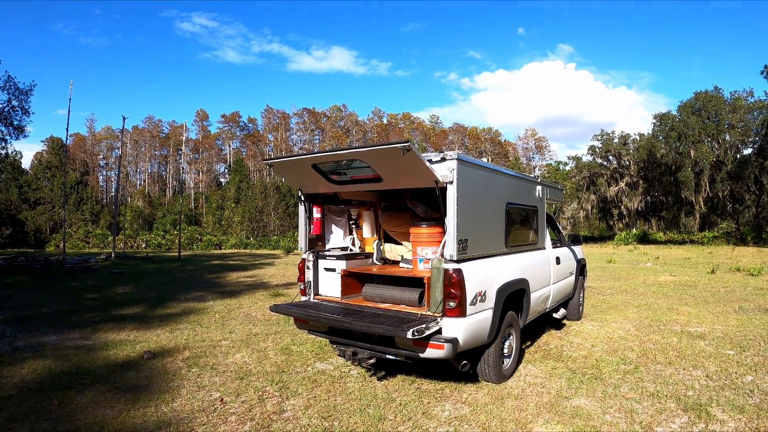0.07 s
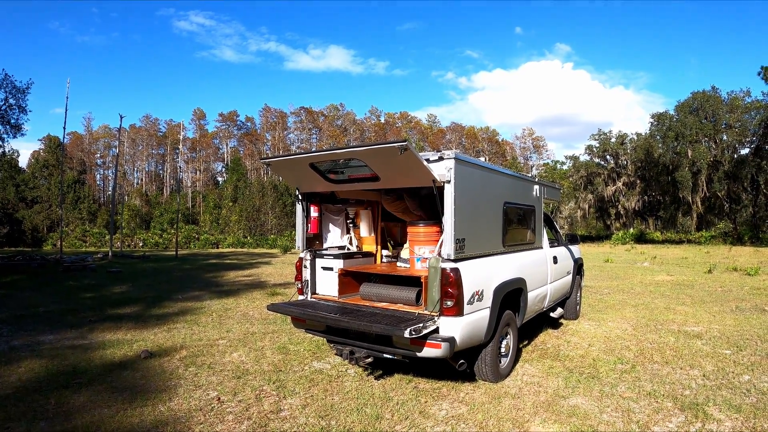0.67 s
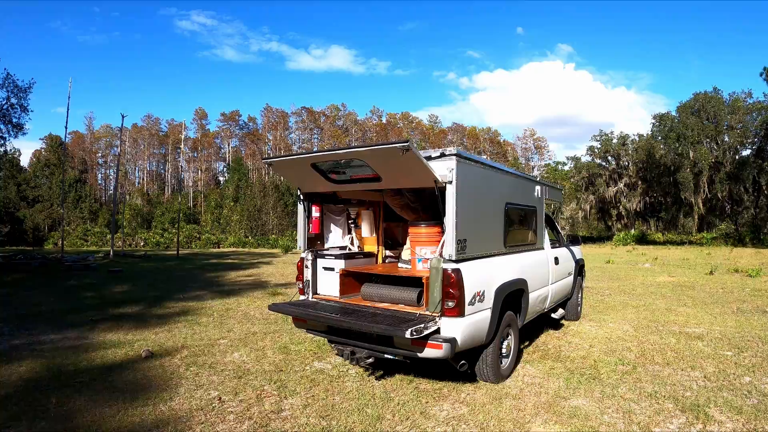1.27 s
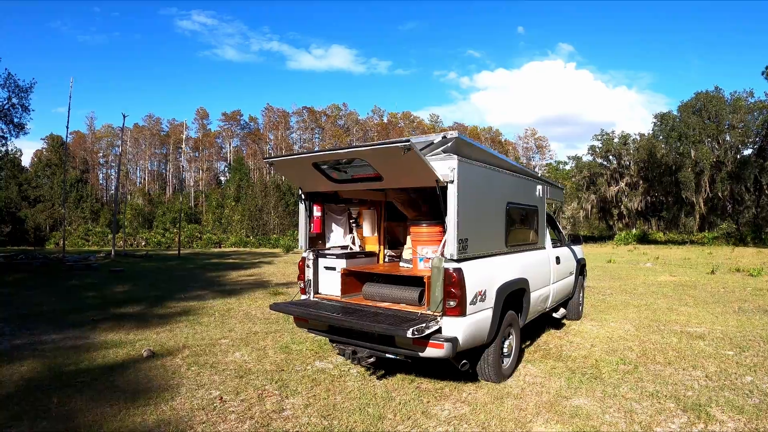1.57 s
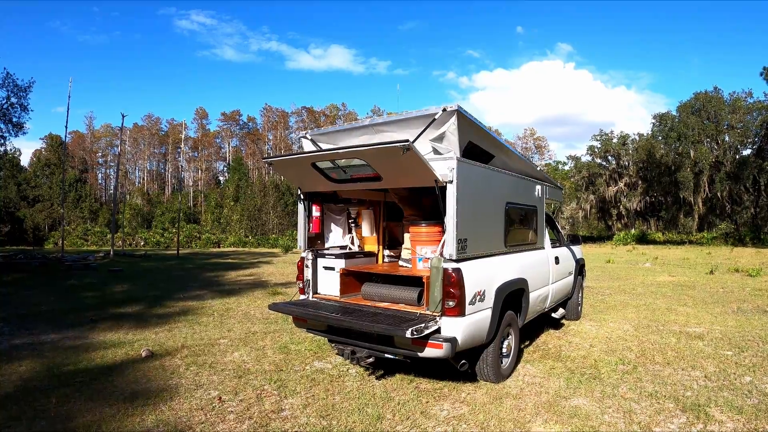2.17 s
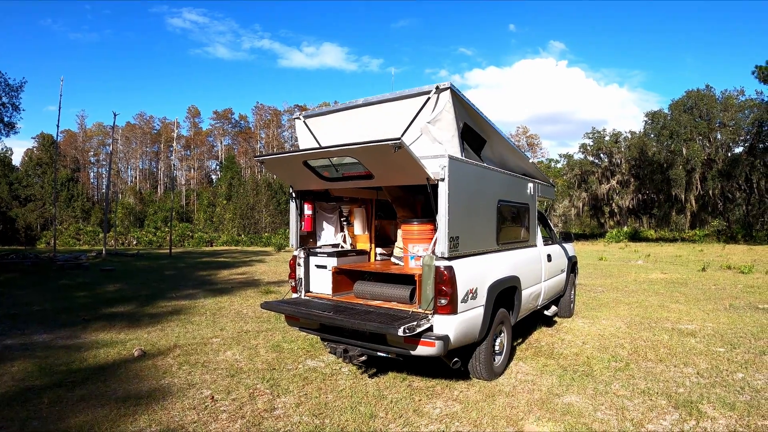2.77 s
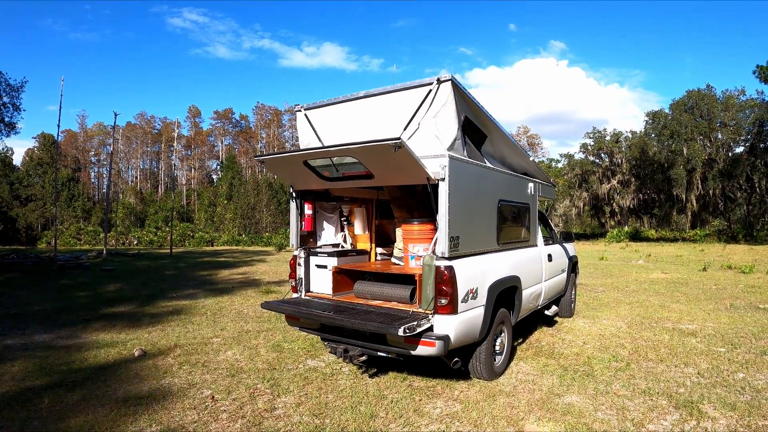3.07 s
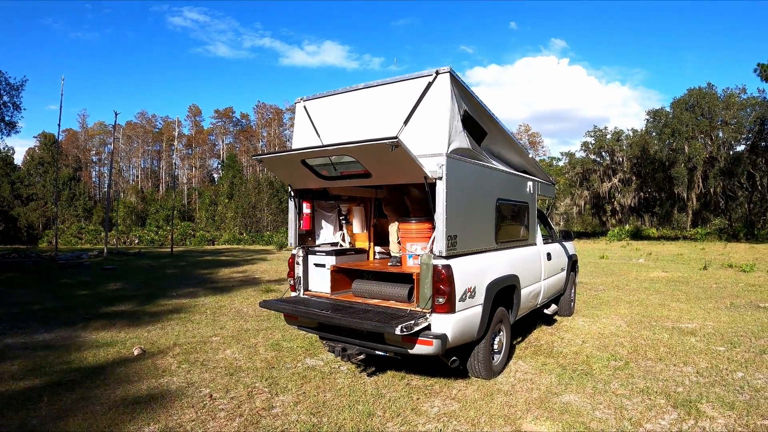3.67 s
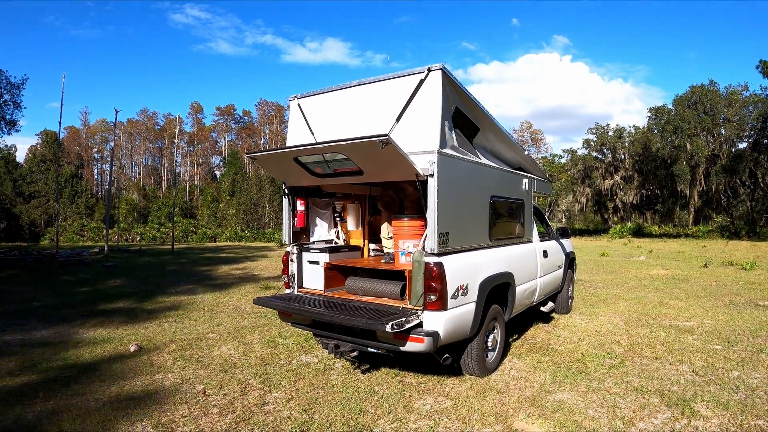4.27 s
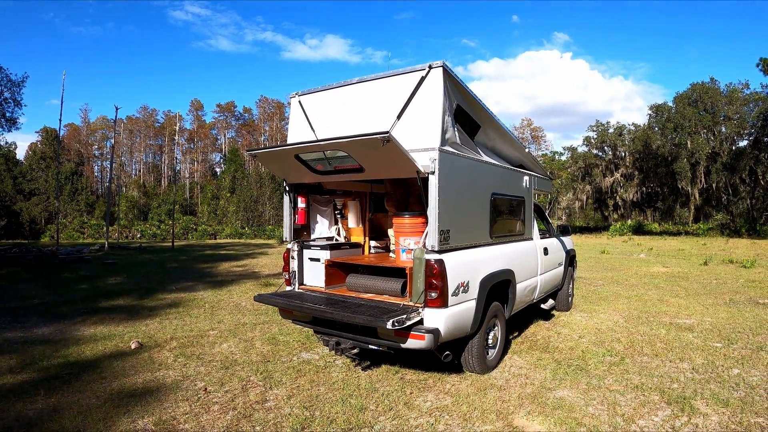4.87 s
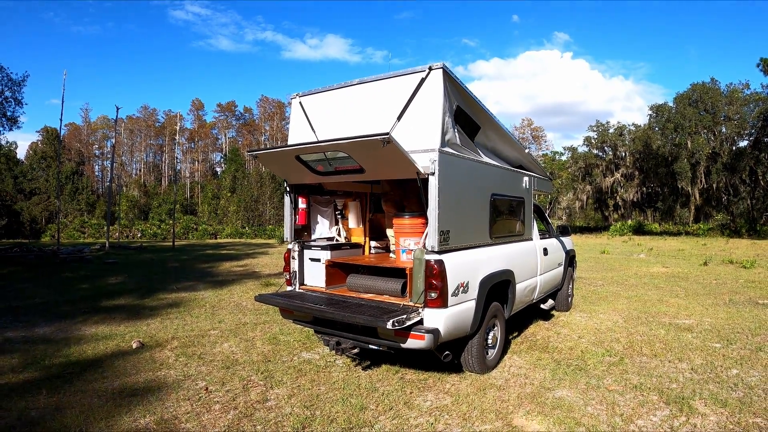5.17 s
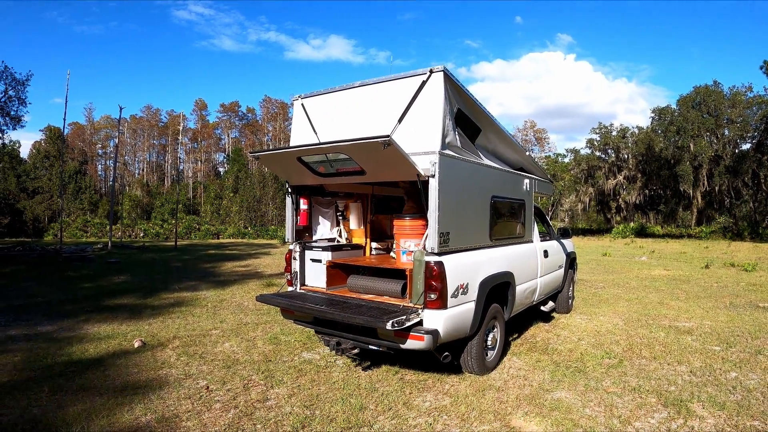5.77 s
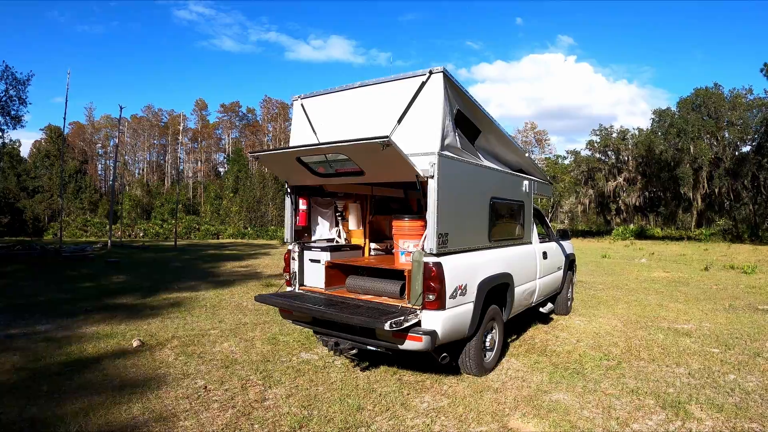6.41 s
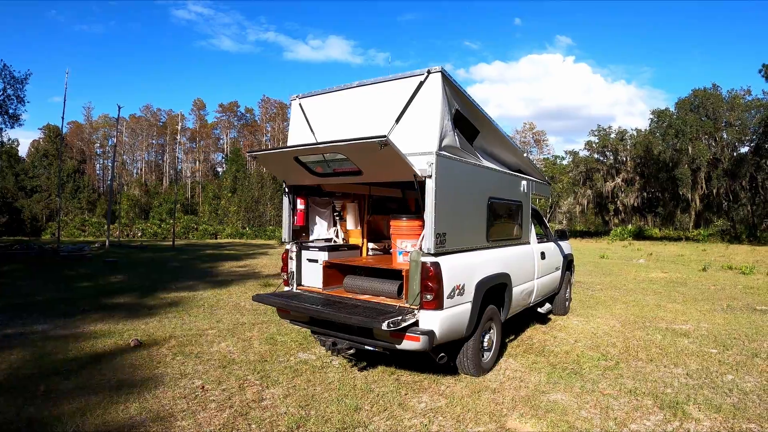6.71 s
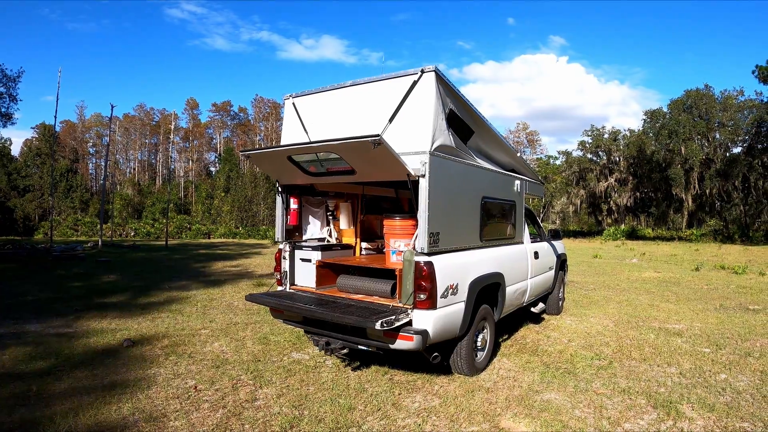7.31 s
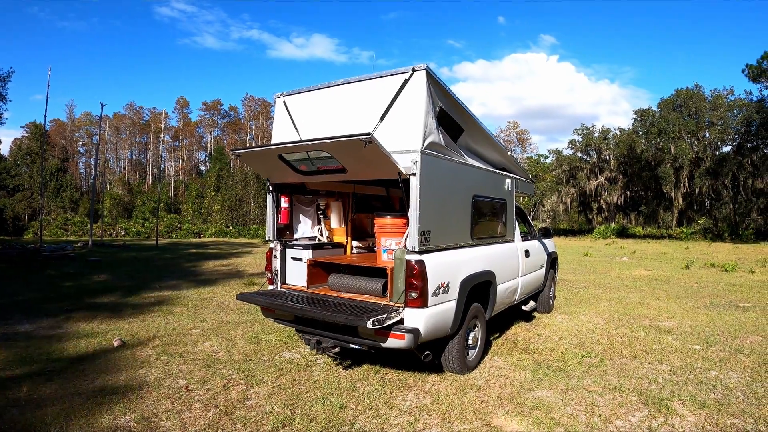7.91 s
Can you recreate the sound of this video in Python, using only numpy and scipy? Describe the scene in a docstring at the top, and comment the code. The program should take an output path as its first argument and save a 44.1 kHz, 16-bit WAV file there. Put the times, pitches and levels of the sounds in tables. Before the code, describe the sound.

Someone shifts inside a wooden truck camper, thumping and knocking, then pushes up the canvas-sided roof, which bangs against its stop.

```python
"""Inside a small wooden truck camper, a close pair of microphones an arm's length from the walls.
Someone shifts about and pushes up the spring-assisted roof. Feet thump the floor, panels knock and
scuff, fittings tick and creak, and the canvas wall rustles as it unfolds. The roof bangs against its
stop and leaves the shell swaying. Behind it all lies the faint hush of the field outside."""
import sys
import numpy as np
from scipy import signal
from scipy.fft import rfft, irfft, next_fast_len
from scipy.io import wavfile

SR = 44100
rng = np.random.default_rng(int(sys.argv[2]) if len(sys.argv) > 2 else 0)


def wav_out(sig):
    """Save sig, one row per channel (or a flat mono array), as 16-bit PCM at SR to the path in sys.argv[1]."""
    wavfile.write(sys.argv[1], SR, np.round(np.clip(np.atleast_2d(sig).T, -1, 1) * 32767).astype(np.int16))


N = 355005

# the roof's travel, t/s: the push begins, the springs take over, the canvas is taut, the stop is hit
PUSH_S, SPRINGS_S, TAUT_S, STOP_S = 1.77, 2.8, 3.438, 3.705
MOVE_RISE_DB_PER_S, MOVE_FALL_DB_PER_S = 244, 100

# blows on panels and frame: t/s, body/dB, clack/dB, edge/dB, fizz/dB, t60/s, the part's note f/Hz
PANEL_BLOWS = [(0.428, -31, -30.5, -54, -77, 0.092, 532), (0.592, -29.5, -38.5, -68, -71, 0.13, 290),
               (0.645, -37.5, -50, -80, -82, 0.11, 296), (0.852, -37, -39, -43, -57, 0.15, 510),
               (1.263, -35, -40.5, -58, -60, 0.15, 369), (1.299, -34, -42.5, -61, -68, 0.07, 347),
               (1.428, -41.5, -45.5, -57, -58, 0.18, 403), (1.483, -35.5, -44.5, -46, -69, 0.048, 706),
               (1.965, -35.5, -35.5, -52.5, -77, 0.062, 650), (2.372, -41.5, -56, -67, -70, 0.12, 266),
               (2.6192, -38.5, -33.5, -47, -59, 0.012, 840), (2.809, -42.5, -38.5, -54, -74, 0.11, 663),
               (3.666, -24, -30, -39.5, -34.5, 0.18, 433), (3.699, -30.5, -34, -34.5, -41, 0.04, 820),
               (3.7067, -19, -21.5, -32, -25.5, 0.076, 496), (3.965, -46.5, -45, -52, -58.5, 0.048, 805),
               (4.105, -42, -49.5, -59, -51, 0.043, 364), (4.672, -28.5, -44, -32.5, -45, 0.098, 466),
               (4.7776, -34, -35.5, -36, -54, 0.084, 530), (5.706, -41, -53, -57, -91, 0.12, 620),
               (5.894, -55, -58.5, -65.5, -66, 0.052, 600), (6.247, -48, -54.5, -83, -88, 0.032, 617),
               (6.325, -45, -52, -67, -63, 0.089, 570), (6.933, -34, -55, -59, -46.5, 0.18, 264),
               (7.888, -48, -79, -82, -82, 0.14, 262)]
# weight landing on the floor or pushing the roof: t/s, level/dB, f/Hz, swell/s, relative boom/dB
FOOTFALLS = [(0.319, -41.5, 114, 0.013, -4), (0.396, -36, 25, 0.016, -8.5),
             (0.551, -21.5, 60, 0.019, -10.5), (0.568, -18.5, 40, 0.034, -10.5),
             (0.824, -26.5, 16, 0.045, -22), (1.245, -31, 18.6, 0.068, -13.5),
             (2.958, -40, 140, 0.0088, -1), (3.374, -38, 130, 0.0056, -12), (4.071, -41, 85, 0.029, 0),
             (5.03, -47, 163, 0.016, -7), (5.547, -42.5, 55, 0.013, -5), (5.696, -32, 50, 0.023, -7.5),
             (6.316, -33, 68, 0.035, -7), (6.391, -30, 45, 0.046, -14.5), (6.681, -42, 59, 0.029, -21),
             (6.921, -29, 52, 0.023, 1), (7.905, -37.5, 34.7, 0.025, -25)]
# shoes, knees and roof frame sliding on wood: t/s, length/s, level/dB, relative grit/dB, rasp f/Hz
WOOD_SCUFFS = [(0.546, 0.013, -34.5, -15, 570), (0.558, 0.032, -31.5, -10, 1300),
               (0.825, 0.059, -44, -2.5, 910), (0.851, 0.056, -41, -21, 490),
               (1.019, 0.08, -41, -10.5, 850), (1.069, 0.065, -36.5, -25, 1090),
               (1.214, 0.11, -42, -18, 1120), (1.263, 0.11, -40.5, -19, 440),
               (3.243, 0.056, -42.5, -3, 1040), (3.428, 0.075, -39, -2.5, 950),
               (4.055, 0.042, -52, -0.5, 970), (4.393, 0.062, -54, -5.5, 426),
               (4.833, 0.044, -48.5, -6, 1180), (6.344, 0.13, -46.5, -17, 457), (6.858, 0.1, -51, -17, 474),
               (6.927, 0.035, -36.5, -13.5, 283)]
# snaps of canvas and small fittings: t/s, body/dB, edge/dB, fizz/dB, note f/Hz
SNAPS = [(0.199, -74, -57, -39.5, 7300), (1.112, -42, -40, -52, 3400), (0.8268, -44, -45.5, -57, 3460),
         (1.2357, -71, -44, -79, 3340), (1.324, -38, -63, -45.5, 2400), (1.515, -44, -43, -50.5, 4400),
         (1.6923, -44.5, -43.5, -43, 2400), (1.722, -39, -41.5, -41.5, 2380), (2.3716, -42, -43, -31, 9300),
         (2.4448, -44, -46, -44.5, 5400), (3.062, -44, -56, -49, 2870), (3.2046, -40.5, -43, -36.5, 5370),
         (3.4195, -34, -33, -24.5, 7100), (4.309, -80, -60.5, -50, 8100), (7.031, -68, -58, -44.5, 8900)]
# struts and seams sliding under load: t/s, length/s, level/dB, start f/Hz, end f/Hz, width/Hz
STRUT_CREAKS = [(2.153, 0.51, -57.5, 1005, 940, 70), (2.117, 0.71, -59.5, 690, 650, 60),
                (3.381, 0.022, -37.5, 1070, 1200, 90), (3.425, 0.0092, -36, 680, 980, 110),
                (3.461, 0.034, -37, 723, 1290, 70), (3.484, 0.025, -37, 1550, 2050, 221)]
# joints cracking as the load shifts: t/s, level/dB
JOINT_CRACKS = [(0.183, -36.5), (0.291, -40), (4.9286, -39), (4.951, -41), (5.154, -42.5), (5.351, -44.5),
                (5.5367, -44), (5.588, -42), (6.4536, -41)]
# body and clothes brushing the panels: t/s, length/s, rubbing/dB, cloth/dB
BODY_MOVES = [(0.0, 0.018, -50, -53.5), (0.196, 0.33, -59.5, -61.5), (0.428, 0.21, -49, -61),
              (0.838, 0.26, -47.5, -81), (1.046, 0.32, -47, -68), (1.417, 0.26, -48.5, -57.5),
              (1.91, 0.19, -49, -54.5), (2.28, 0.21, -56, -60.5), (3.037, 0.036, -55.5, -55),
              (4.765, 0.14, -55.5, -59), (5.046, 0.032, -57, -62), (5.63, 0.48, -61.5, -87),
              (6.342, 0.42, -55.5, -67.5), (6.944, 0.77, -60.5, -65), (7.778, 0.15, -61.5, -60)]
# cloth passing over cloth: t/s, length/s, level/dB, relative speed
CLOTH_STROKES = [(3.8, 0.0072, -51, 0.81), (6.707, 0.1, -56, 0.67), (7.281, 0.013, -47, 0.96),
                 (7.455, 0.05, -52.5, 0.98)]
# resonances of the panels and cabin air: f/Hz, level/dB, t60/s
CABIN_MODES = [(146.6, 5, 0.13), (206, -4.5, 0.17), (323.6, -2.5, 0.2), (471.7, -8.5, 0.2),
               (545, -16, 0.17), (635, -11.5, 0.4), (845, -5, 0.091), (1126, -5.5, 0.13), (1350, -2, 0.12),
               (1675, -23, 0.09)]
# spectra of the drumming roof, swaying shell, rubbed wood, canvas, swishes and air: f/Hz, level/dB
ROOF_SPECTRUM = [(45, -10), (80, 8.5), (150, -0.5), (210, -3), (300, -12.5), (500, -17.5), (1200, -48)]
SWAY_SPECTRUM = [(4, -40), (13, 13.5), (24, -11.5), (38, 2.5), (52, -1), (85, -17), (200, -27), (600, -91)]
RUB_SPECTRUM = [(90, -50), (200, -2), (300, 1.5), (500, -2.5), (800, -4), (1200, -5), (1900, -11),
                (2800, -29), (4500, -25.5), (9000, -56)]
CANVAS_SPECTRUM = [(900, -9), (2000, -1.5), (2800, -10.5), (4200, -8.5), (6000, -9.5), (9000, -3),
                   (12000, -7), (16000, -16)]
SWISH_SPECTRUM = [(1200, -14.5), (2700, -5.5), (3400, -9), (4500, -26), (7000, -14), (9000, -0.5),
                  (11000, -8), (16000, -9)]
AIR_SPECTRUM = [(30, 9), (100, -14.5), (250, -16.5), (550, -6), (1000, -12.5), (2200, -15), (4000, -17.5),
                (9000, -15), (16000, -19)]
# likeness of the two microphones: f/Hz, correlation
PAIR_COHERENCE = [(60, .998), (700, .99), (1400, .95), (2200, .75), (3100, .1), (16000, 0)]
# balance of the pair: f/Hz, left minus right level/dB
PAIR_BALANCE = [(60, 1.3), (500, 1.7), (1100, 2.8), (2300, 4.7), (10000, 4), (13000, -2.5)]
# response of each microphone: f/Hz, level/dB
MIC_RESPONSE = [(30, 9), (150, -0.5), (500, -2.5), (1200, -6.5), (2000, -7.5), (3000, -5.5), (4300, -8.5),
                (6000, -7), (8200, -7.5), (11000, -10.5), (15500, -13)]


def knocks():
    """Each blow rings the part that it lands on, the panels and the metal frame; the treble dies first."""
    out = np.zeros((2, N))
    for s, body_db, clack_db, edge_db, fizz_db, t60, hz in PANEL_BLOWS:
        blow = echoes(t60, direct=5.1, tail_db=-21, tail_t60=0.13)
        wood = panels(blow + 1.6 * peak(blow, hz, 7), ring=1.2)
        crack = echoes(t60 * 0.84, direct=5.7, tail_db=-16, tail_t60=0.15)
        metal = crack + 0.99 * (peak(crack, 2670, 2.8) + peak(crack, 3550, 32) + peak(crack, 7500, 2.6))
        add(out, s, struck(band(wood, 147, 834), body_db) + struck(band(wood, 1035, 1880), clack_db))
        add(out, s, struck(band(metal, 1650, 4600), edge_db) + struck(band(metal, 6400, 13300), fizz_db))
    return out


def thumps(ring_db=-12, ring_t60=0.66):
    """A soft heavy push swells one low swing of the floor, which rings on, and shakes the panels."""
    out, t = np.zeros((2, N)), np.arange(SR) / SR
    for s, db, hz, swell_s, boom_db in FOOTFALLS:
        push = (t / swell_s * np.exp(1 - t / swell_s)) ** 2
        ring = gain_of(ring_db - 60 * t / ring_t60) * (1 - np.exp(-t / swell_s)) ** 2
        swing = (push + ring) * np.sin(2 * np.pi * hz * t)
        boom = gain_of(boom_db) * push * unit_rms(band(noise(SR), 45, 138))
        add(out, s, gain_of(db) * (swing + boom))
    return out


def roof_bounce(first_hz=20, settled_hz=15, settle_s=0.162, attack_s=0.029, t60=0.75, linger_t60=4.9):
    """The stop leaves the roof bouncing on its springs, pumping the cabin air; the swings slow a little."""
    t = np.maximum(np.arange(N) / SR - STOP_S, 0)
    hz = settled_hz + (first_hz - settled_hz) * np.exp(-t / settle_s)
    phase = 2 * np.pi * np.cumsum(hz) / SR
    decay = gain_of(-20 - 60 * t / t60) + gain_of(-27.5 - 60 * t / linger_t60)
    return decay * (1 - np.exp(-t / attack_s)) * (np.sin(phase) + 0.1 * np.sin(2 * phase))


def shell(effort, drum_db=-9, lean_db=-4, travel_db=-60):
    """The roof drums and the whole box heaves; both also follow whoever leans on it."""
    drumming = shaking(rest_db=-69, step_db=-32.5, step_fall_db_per_s=46.5, stop_db=-30, lead_s=0.089,
                       rise_db_per_s=81, fall_db_per_s=77, tail_db=-37.5, tail_db_per_s=19.5)
    swaying = shaking(rest_db=-55, step_db=-13.5, step_fall_db_per_s=50, stop_db=-28, lead_s=0.079,
                      rise_db_per_s=103, fall_db_per_s=68, tail_db=-39.5, tail_db_per_s=13)
    travel = gain_of(travel_db) * swell(PUSH_S, STOP_S - PUSH_S)
    flex = unit_rms(coloured(panels(noise(), ring=1), ROOF_SPECTRUM))
    sway = unit_rms(coloured(noise(), SWAY_SPECTRUM))
    return (power_sum(drumming, travel, gain_of(drum_db) * effort) * flex
            + power_sum(swaying, gain_of(lean_db) * effort) * sway)


def shaking(rest_db, step_db, step_fall_db_per_s, stop_db, lead_s,
            rise_db_per_s, fall_db_per_s, tail_db, tail_db_per_s):
    """Gain of the box's shaking: footfalls jolt it, the roof builds it up to the stop, then it settles."""
    steps = [gain_of(db + step_db) * swell(s + swell_s, 0, fall_db_per_s=step_fall_db_per_s)
             for s, db, _, swell_s, _ in FOOTFALLS]
    run = gain_of(stop_db) * swell(STOP_S - lead_s, lead_s, rise_db_per_s, fall_db_per_s)
    tail = gain_of(tail_db) * swell(STOP_S, 0, rise_db_per_s, tail_db_per_s)
    return power_sum(gain_of(rest_db), run, tail, *steps)


def whoomp(level_db=-35):
    """Air drawn in under the rising roof makes the canvas whoomp just before the stop."""
    wind = unit_rms(band(panels(noise(), ring=0.83), 135, 530))
    return gain_of(level_db) * swell(STOP_S - 0.13, 0.051, rise_db_per_s=85, fall_db_per_s=130) * wind


def scuffs(attack_s=0.0063, release_t60=0.12):
    """Bursts of stick and slip: a jerky rasp around one resonance of the wood, and grit above it."""
    out, t = np.zeros((2, N)), np.arange(SR // 3) / SR
    for s, length, db, grit_db, hz in WOOD_SCUFFS:
        release = gain_of(-60 * np.maximum(t - 0.76 * length, 0) / release_t60)
        stroke = np.minimum(t / attack_s, 1) * release
        grains = slips(len(t), per_s=1700, spread_db=-1.5) * flicker(1, per_s=162, length=len(t))
        wood = panels(grains, ring=0.8)
        rasp = unit_rms(band(peak(wood, hz, 2.2) + 0.25 * wood, 170, 2090))
        grit = unit_rms(band(grains + 0.14 * peak(grains, 13800, 16), 2500, 12200, order=2))
        add(out, s, gain_of(db) * stroke * (rasp + gain_of(grit_db) * grit))
    return out


def ticks():
    """Canvas and fittings snap brightly, each with its own note and little weight behind it."""
    out = np.zeros((2, N))
    for s, body_db, edge_db, fizz_db, hz in SNAPS:
        snap = echoes(t60=0.05, direct=6.5, tail_db=-12, tail_t60=0.085)
        snap = snap + 1.4 * peak(snap, hz, 14)
        body = struck(band(panels(snap, ring=0.29), 177, 1850, order=2), body_db - 2)
        edge = struck(band(snap, 2460, 5340), edge_db - 1)
        fizz = struck(band(snap, 6460, 13500), fizz_db)
        add(out, s, body + edge + fizz)
    return out


def creaks():
    """Quick slips excite one narrow resonance that glides with the tension."""
    out = np.zeros((2, N))
    for s, length, db, from_hz, to_hz, width_hz in STRUT_CREAKS:
        progress = np.linspace(0, 1, int(length * SR))
        hz = from_hz * (to_hz / from_hz) ** progress
        carrier = np.exp(2j * np.pi * np.cumsum(hz) / SR)
        grains = slips(len(progress), per_s=7000, spread_db=-3)
        # shift down, low-pass, shift back: a band that follows the note
        rasp = carrier * signal.lfilter(*signal.butter(2, width_hz, fs=SR), grains / carrier)
        arch = 2 * np.sqrt(progress * (1 - progress))
        add(out, s, gain_of(db) * arch * unit_rms(rasp.real))
    return out


def rubbing(effort, rest_db=-71, bump_db=-10, linger_s=0.0075):
    """Uneven friction grains and the odd dull bump, carried by the panels and the cabin's echoes."""
    grains = slips(N, per_s=1900, spread_db=1.5) * flicker(4, per_s=45)
    echo_power = signal.lfilter([1], [1, -np.exp(-1 / (linger_s * SR))], grains ** 2)
    grains = unit_rms(grains) + unit_rms(np.sqrt(echo_power) * noise())
    wood = unit_rms(coloured(panels(grains, ring=0.7), RUB_SPECTRUM))
    bumps = unit_rms(band(panels(slips(N, per_s=16, spread_db=1), ring=0.6), 140, 470, order=2))
    return power_sum(effort, gain_of(rest_db)) * (wood + gain_of(bump_db) * bumps)


def movements():
    """Two gains: how hard the person rubs the panels, and how much clothing slides."""
    body = power_sum(*(gain_of(db) * swell(s, length) for s, length, db, _ in BODY_MOVES))
    clothes = power_sum(*(gain_of(db) * swell(s, length) for s, length, _, db in BODY_MOVES))
    return body, clothes


def frame_friction(push_db=-57, run_db=-48):
    """Gain of the roof frame's rubbing: steady in the push, harder as the springs run it to the stop."""
    push = swell(PUSH_S, SPRINGS_S - PUSH_S, rise_db_per_s=120, fall_db_per_s=5)
    run = swell(TAUT_S, STOP_S - TAUT_S, rise_db_per_s=59, fall_db_per_s=170)
    return power_sum(gain_of(push_db) * push, gain_of(run_db) * run)


def canvas(sliding, rest_db=-71, crinkle=0.54):
    """Cloth slides with small crinkles in it; its dull and bright parts come and go separately."""
    weave = noise() + crinkle * slips(N, per_s=130, spread_db=-0.5)
    cloth = unit_rms(coloured(weave, CANVAS_SPECTRUM))
    dull = band(cloth, 900, 9400, order=1)
    rustle = sum(part * flicker(3, per_s=40) for part in (dull, cloth - dull))
    return power_sum(gain_of(0.9) * sliding, gain_of(rest_db)) * rustle


def unfolding(folds_db=-57, taut_db=-42):
    """Gain of the canvas wall's sliding: its folds part, it is drawn tight, then it hangs still."""
    folds = swell(PUSH_S, 0, rise_db_per_s=73, fall_db_per_s=5)
    taut = swell(TAUT_S, 0, rise_db_per_s=49, fall_db_per_s=68)
    moving = swell(0, STOP_S, rise_db_per_s=0, fall_db_per_s=328)
    return moving * power_sum(gain_of(folds_db) * folds, gain_of(taut_db) * taut)


def crumples(handling, level_db=-9, ring_s=0.0039):
    """Stiff cloth buckles in clumps of tiny snaps; creases of each size have their own note."""
    out, t = np.zeros((2, N)), np.arange(SR // 50) / SR
    for hz in np.geomspace(2300, 7000, 5):
        snap = unit_rms(peak(np.exp(-t / ring_s) * noise(len(t)), hz, 5.5))
        out += signal.oaconvolve(slips(N, per_s=110, spread_db=-1.5), snap, axes=1)[:, :N]
    return gain_of(level_db) * handling * unit_rms(out * flicker(5, per_s=35))


def swishes():
    """Soft, quick strokes of canvas or a sleeve; the faster the weave slides, the higher it zips."""
    out = np.zeros((2, N))
    for s, length, db, speed in CLOTH_STROKES:
        spectrum = [(hz * speed, level) for hz, level in SWISH_SPECTRUM]
        weave = unit_rms(coloured(noise(), spectrum))
        out += gain_of(db) * swell(s, length, rise_db_per_s=332, fall_db_per_s=220) * weave
    return out


def joints(trim_db=-15, attack_s=0.001, t60=0.02):
    """A joint gives by a hair: a faint, dry tap with a short woody ring."""
    out, t = np.zeros((2, N)), np.arange(SR // 20) / SR
    for s, db in JOINT_CRACKS:
        slip = np.minimum(t / attack_s, 1) * gain_of(-60 * t / t60) * noise(len(t))
        tap = band(slip + 4 * peak(slip, 1960, 3.7), 740, 15000, order=2)
        add(out, s, struck(tap, db + trim_db))
    return out


def field_air(level_db=-60.5):
    """The still air beyond the walls: a faint, smooth hush."""
    return gain_of(level_db) * unit_rms(coloured(noise(), AIR_SPECTRUM))


def panels(x, ring):
    """The cabin's resonances ring on top of what excites them."""
    return x + ring * sum(gain_of(db) * peak(x, hz, hz * t60 / 2.2) for hz, db, t60 in CABIN_MODES)


def echoes(t60, direct, tail_db, tail_t60, onset_s=0.0015):
    """A blow at close range: a clean first arrival, dense wall reflections and a tail."""
    t = np.arange(SR // 4) / SR
    decay = np.exp(-t / onset_s) + gain_of(-60 * t / t60) + gain_of(tail_db - 60 * t / tail_t60)
    out = (1 - np.exp(-t / onset_s)) * decay * noise(len(t))
    out[[0, 1], [40, 45]] += direct  # the left microphone is five samples nearer
    return out


def slips(length, per_s, spread_db):
    """Tiny random slips of uneven size, reaching both microphones at once."""
    size = gain_of(spread_db * np.minimum(rng.exponential(1, length), 4.5))
    slipping = rng.random(length) < per_s / SR
    return unit_rms(size * slipping * noise(length))


def flicker(depth_db, per_s, length=N):
    """A gain that wanders at random by depth_db rms."""
    knots = rng.standard_normal(4000)
    drift = np.interp(np.arange(length) * per_s / SR, np.arange(len(knots)), knots)
    return gain_of(depth_db * unit_rms(drift))


def swell(start, length, rise_db_per_s=MOVE_RISE_DB_PER_S, fall_db_per_s=MOVE_FALL_DB_PER_S):
    """A gain that builds up to 1 at start, holds, and dies away."""
    t = np.arange(0, N + 64, 64) / SR
    db = -rise_db_per_s * np.maximum(start - t, 0) - fall_db_per_s * np.maximum(t - start - length, 0)
    return np.interp(np.arange(N) / SR, t, gain_of(np.maximum(db, -150)))


def noise(length=N):
    """White noise, separate for each microphone."""
    return rng.standard_normal((2, length))


def gain_of(db):
    """Decibels to amplitude."""
    return 10 ** (np.asarray(db) / 20)


def unit_rms(x):
    """Scales to rms 1."""
    return x / np.sqrt(np.mean(x ** 2) + 1e-20)


def struck(x, db):
    """Sets the rms level of a blow's first 20 ms."""
    return gain_of(db) * x / np.sqrt(np.mean(x[:, :SR // 50] ** 2))


def power_sum(*gains):
    """Unrelated causes add in power."""
    return np.sqrt(sum(gain ** 2 for gain in gains))


def add(mix, s, sound):
    """Lays a two-channel sound into the mix at time s."""
    part = mix[:, max(round(s * SR), 0):][:, :sound.shape[1]]
    part += sound[:, :part.shape[1]]


def peak(x, hz, sharpness):
    """One resonance of gain 1; sharpness is its frequency over its width."""
    return signal.lfilter(*signal.iirpeak(hz, sharpness, fs=SR), x)


def band(x, lo_hz, hi_hz, order=3):
    """Causal band-pass."""
    return signal.sosfilt(signal.butter(order, [lo_hz, hi_hz], "band", fs=SR, output="sos"), x)


def curve_at(points, hz):
    """Reads a curve on a log-frequency axis."""
    f, value = np.transpose(points)
    return np.interp(np.log(hz + 1), np.log(f + 1), value)


def coloured(x, spectrum):
    """Filters a long sound by a spectrum."""
    size = next_fast_len(N + 4096)
    hz = np.fft.rfftfreq(size, 1 / SR)
    return irfft(rfft(x, size) * gain_of(curve_at(spectrum, hz)), size)[:, :N]


def microphone_pair(x):
    """Two close microphones: alike in the bass, unrelated in the treble, mostly louder on the left."""
    size = next_fast_len(N + 4096)
    hz = np.fft.rfftfreq(size, 1 / SR)
    left, other = rfft(x, size)
    coherence = np.clip(curve_at(PAIR_COHERENCE, hz), -1, 1)
    right = coherence * left + np.sqrt(1 - coherence ** 2) * other
    lean = gain_of(curve_at(PAIR_BALANCE, hz) / 2)
    return irfft(np.array([left * lean, right / lean]), size)[:, :N]


def scene():
    """The person, the roof and the air outside, heard from within the cabin."""
    body, clothes = movements()
    effort = power_sum(body, frame_friction())
    sliding = power_sum(clothes, unfolding())
    handling = power_sum(body, sliding)
    blows = knocks() + ticks() + joints() + thumps()
    friction = scuffs() + rubbing(effort) + canvas(sliding) + crumples(handling) + swishes() + creaks()
    return microphone_pair(blows + friction + shell(effort) + roof_bounce() + field_air() + whoomp())


def record(dry):
    """The microphones' bass-heavy response, then a band limit at 16.2 kHz."""
    low_pass = signal.firwin(511, 16200, window=("kaiser", 9), fs=SR)
    return signal.oaconvolve(coloured(dry, MIC_RESPONSE), low_pass[None], "same")


dry = scene()
out = record(dry)
wav_out(out)
```